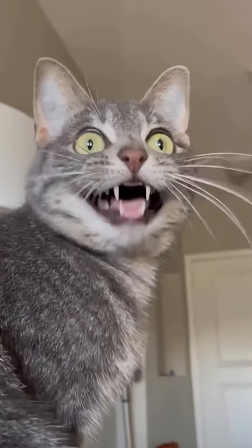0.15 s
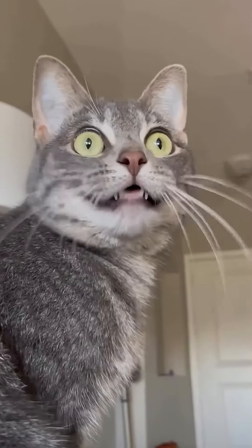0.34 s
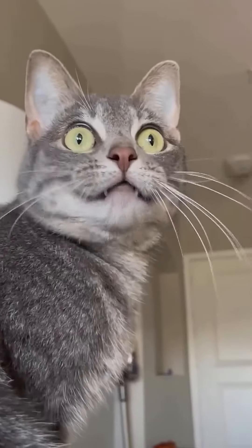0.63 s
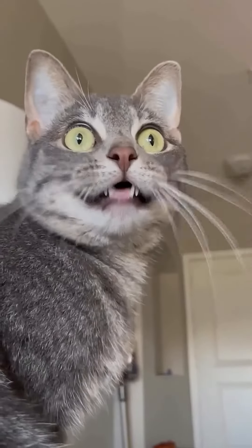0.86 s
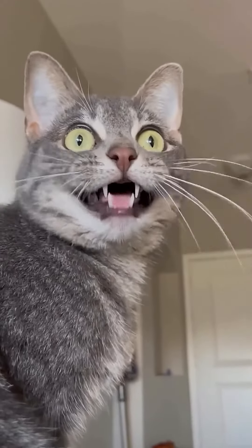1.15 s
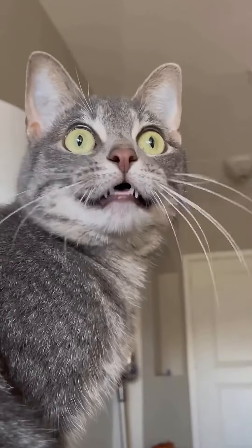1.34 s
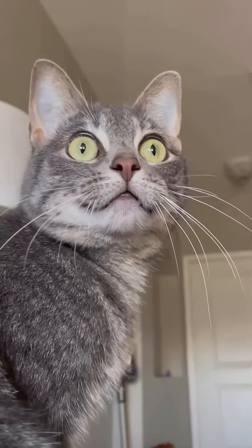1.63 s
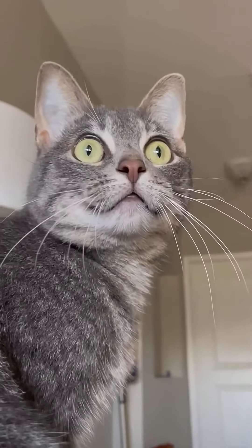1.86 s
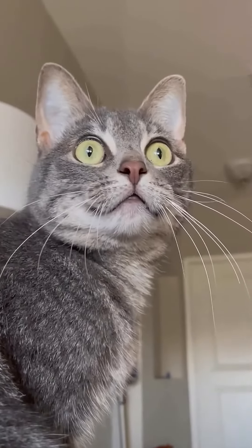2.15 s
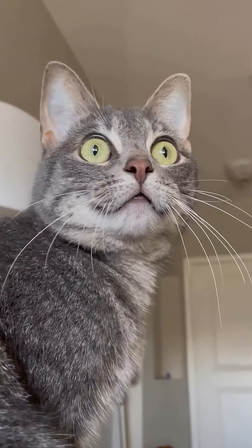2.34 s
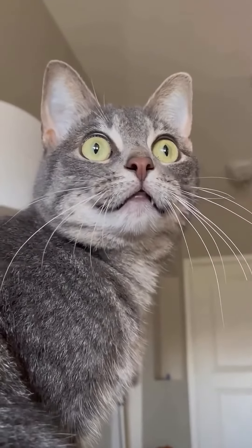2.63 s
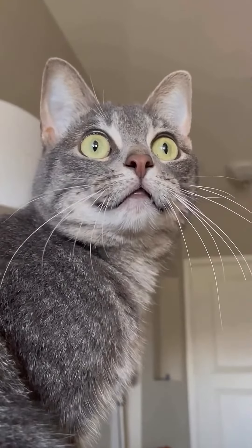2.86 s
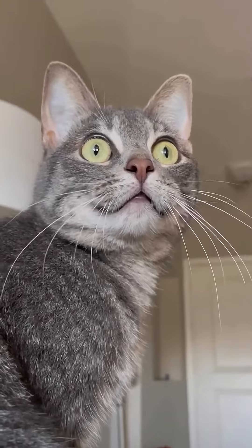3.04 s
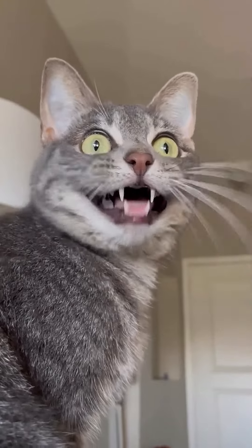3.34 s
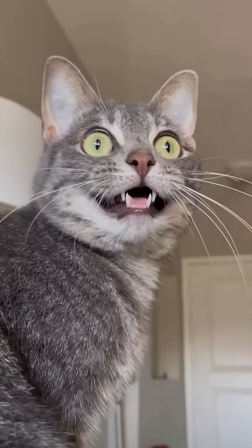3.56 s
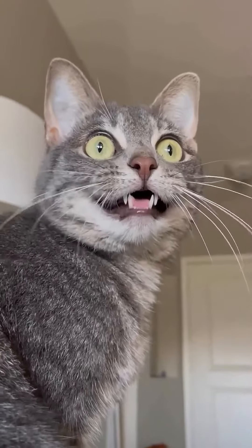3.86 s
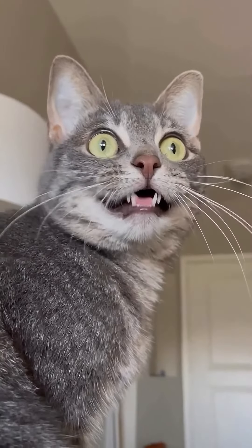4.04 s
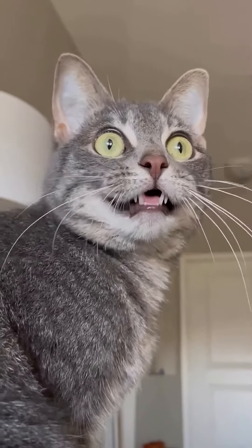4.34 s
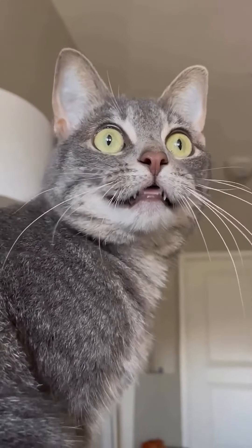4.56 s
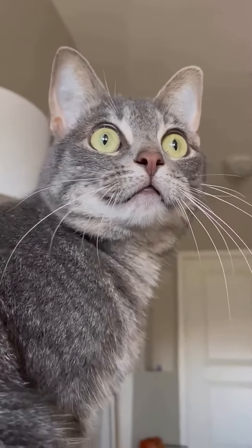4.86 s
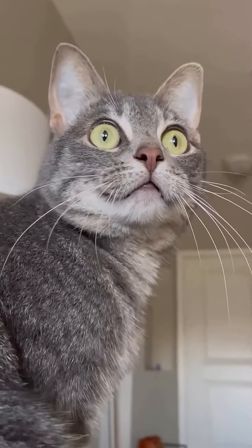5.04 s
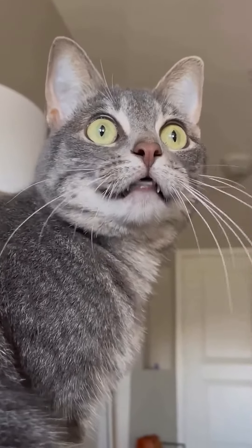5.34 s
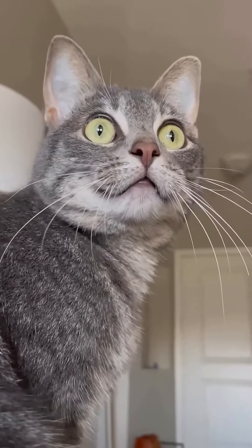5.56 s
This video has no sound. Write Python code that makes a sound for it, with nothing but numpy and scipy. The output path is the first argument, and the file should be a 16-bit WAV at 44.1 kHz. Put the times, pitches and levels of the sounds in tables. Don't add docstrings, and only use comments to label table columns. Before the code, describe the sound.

Dry, bright tooth clicks from a nearby cat come first in a pair, then singly, then in a pair again. Two short chirps lead to one very brief, rough mew, then a softer clustered click and a final hard snap. Soft body thuds and faint room hum lie underneath, with a short small-room echo. Suddenly a boomy motor rumble and rushing air take over, with two small breathy huffs.

```python
import sys
import numpy as np
from scipy import signal
from scipy.fft import rfft, irfft, next_fast_len
from scipy.io import wavfile
from scipy.ndimage import map_coordinates

SR = 44100
rng = np.random.default_rng(int(sys.argv[2]) if len(sys.argv) > 2 else 0)


def undo_db(level):
    steps = np.asarray(level, float) / 20
    return 10 ** steps


def wrap_up_sound(samples):
    columns = np.atleast_2d(samples).T
    tamed = np.clip(columns, -1, 1)
    steps = np.round(tamed * 32767).astype(np.int16)
    wavfile.write(sys.argv[1], SR, steps)


N = 251370
CHANGE_S = 5.03


def unit(x):
    return x / np.sqrt(np.mean(x ** 2) + 1e-20)


def along(points, hz):
    f, v = np.transpose(points)
    return np.interp(np.log(hz + 1), np.log(f + 1), v)


def curves(rows):
    s, *cols = np.transpose(rows)
    t = np.arange(N) / SR
    return [np.interp(t, s, c, left=-120, right=-120) for c in cols]


def wobble(rate, size):
    knots = rng.standard_normal(int(size * rate / SR) + 4)
    return map_coordinates(knots, [np.arange(size) * rate / SR])


def filtered(x, response):
    m = next_fast_len(len(x) + 4096)
    return irfft(rfft(x, m) * response(np.fft.rfftfreq(m, 1 / SR)), m)[:len(x)]


def modes(peaks, f):
    total = 0
    for k, (centre, width, db) in enumerate(peaks):
        resonance = 1j * f * width / (centre * centre - f * f + 1j * f * width)
        total = total + (-1) ** k * undo_db(db) * resonance
    return total


def noise(spectrum):
    return unit(filtered(rng.standard_normal(N), lambda hz: undo_db(along(spectrum, hz))))


def add(track, s, sound):
    part = track[max(round(s * SR), 0):][:len(sound)]
    part += sound[:len(part)]


# frequency in Hz, width in Hz, level in dB re rumble.
HUM = [
    (62, 33, -5.5),
    (124.7, 13, -6.5),
]
# frequency in Hz, density in dB per Hz.
RUMBLE = [(13, -41.5), (22, -14), (65, 0), (92, -3.5), (124, 1.5), (150, -19), (200, -54.5), (330, -120)]
DUCTS = [(82, -33.5), (140, -8.5), (193, -4.5), (355, -13.5), (500, -17.5), (700, -25), (910, -51.5),
         (1540, -120)]
HISS = [(350, -28), (600, -11), (696, -11.5), (766, -4), (808, -1.5), (2290, -7.5), (2950, -10.5),
        (5300, -10), (6910, -17), (7600, -63.5), (9880, -83), (16700, -120)]
# time in seconds, change of level in dB.
SETTLES = [
    (0, 0.5),
    (3.2, 1.5),
    (3.7, -9.5),
    (4.56, -9.5),
    (5.04, -10),
]
RUMBLE_DB, DUCT_DB, HISS_DB = -46.5, -55.5, -65.5
DUCT_FOLLOWS, HISS_FOLLOWS = 0.49, 0.1


def quiet_room():
    change_db, = curves(SETTLES)
    on = np.clip((CHANGE_S + .015 - np.arange(N) / SR) / .01, 0, 1)
    hum = np.zeros(N)
    for hz, width, db in HUM:
        tone = filtered(rng.standard_normal(N), lambda f: modes([(hz, width, 0)], f) ** 2)
        hum += undo_db(db) * unit(tone)
    low = undo_db(3.3 * wobble(9.9, N) - 3.5) * noise(RUMBLE) + hum
    duct_db = DUCT_DB + DUCT_FOLLOWS * change_db + 1.05 + 2.2 * wobble(14, N)
    ducts = undo_db(duct_db) * noise(DUCTS)
    hiss_db = HISS_DB + HISS_FOLLOWS * change_db + 3.0 + 0.54 * wobble(3.1, N)
    hiss = undo_db(hiss_db) * noise(HISS)
    return on * (undo_db(RUMBLE_DB + change_db + 1.0) * low + ducts + hiss)


# frequency in Hz, level in dB.
MOTOR = [
    (57, 3.5),
    (113, -5),
    (170, -15),
    (226, -10.5),
]
# frequency in Hz, density in dB per Hz.
BODY = [(15, -47), (25, -23), (39, -5), (59, -8.5), (85, -7), (117, -6.5), (156, -10.5), (377, -11),
        (719, -25.5), (900, -17.5), (1170, -54), (1980, -120)]
AIR = [(290, -37), (500, -23), (549, 0.5), (718, -30), (906, -5.5), (1300, -9.5), (1620, -9.5),
       (2220, -13.5), (2410, -25), (4470, -28.5), (4850, -26.5), (7130, -40.5), (8100, -54.5),
       (10500, -95.5), (17800, -120)]
MOTOR_DB, BODY_DB, AIR_DB = -37.5, -37, -51
SETTLE_S, START_DB, SWELL_DB_PER_S = 0.024, -20.5, 12
BODY_FASTER, AIR_FASTER = 2.8, 3


def droning_room():
    t = np.arange(N) / SR - CHANGE_S

    def settle(faster):
        return START_DB * np.exp(-np.clip(t * faster / SETTLE_S, -2, None))

    motor_db = MOTOR_DB + settle(0.96) + SWELL_DB_PER_S * np.maximum(t - .3, 0)
    body_db = BODY_DB + settle(BODY_FASTER)
    air_db = AIR_DB + settle(AIR_FASTER)
    drift = np.cumsum(1 + 0.0305 * wobble(12, N)) / SR
    motor = np.zeros(N)
    for hz, db in MOTOR:
        motor += undo_db(db + 1.2 * wobble(5, N)) * np.sin(2 * np.pi * hz * drift)
    on = np.clip(t / .008 + 1, 0, 1)
    body = undo_db(body_db - 1.6) * noise(BODY)
    air = undo_db(air_db + 3.0 + 0.75 * wobble(26, N)) * noise(AIR)
    return on * (undo_db(motor_db + 1.0) * motor + body + air)


# frequency in Hz, t60 in seconds.
WALLS = [(300, 0.08), (900, 0.26), (2300, 0.29), (7000, 0.14)]


def walls(x):
    hz, t, z = signal.stft(rng.standard_normal(SR // 2), SR, nperseg=256)
    decay = undo_db(-60 * t / along(WALLS, hz)[:, None])
    tail = signal.istft(z * decay, SR, nperseg=256)[1]
    return signal.fftconvolve(np.pad(x, (250, 0)), tail / np.linalg.norm(tail))[:N]


# start in seconds, peak level in dB, frequency in Hz.
THUDS = [(0.219, -35, 115), (0.25, -33.5, 135), (1.27, -33.5, 217), (1.284, -30.5, 99), (1.966, -31, 121),
         (2.73, -37, 143), (2.757, -33, 101.5), (3.797, -40.5, 370), (3.83, -42, 117.5),
         (4.732, -44.5, 104), (0.155, -41, 326), (4.73, -33, 502), (4.742, -40, 338), (4.764, -44, 250),
         (3.166, -34, 482)]


def thuds():
    out, t = np.zeros(N), np.arange(SR // 8) / SR
    for s, db, hz in THUDS:
        decay = undo_db(db + 20.0 - 60 * t / 0.02)
        onset = 1 - np.exp(-t / 0.0057)
        add(out, s, decay * np.sin(2 * np.pi * hz * t) * onset)
    return out


# time in seconds, level in dB.
EXHALE = [
    (2.2, -84),
    (2.418, -67.5),
    (2.56, -61),
    (2.614, -65.5),
    (3.08, -64.5),
]


def exhale():
    nose = [(2030, 370, -16.5), (3735, 170, -12.5), (6400, 300, -7.5)]
    air = unit(filtered(rng.standard_normal(N), lambda f: modes(nose, f)))
    return undo_db(curves(EXHALE)[0] + 5.0) * air


SHAPES = {"open": (3500, -1.1, -0.5), "cupped": (2520, 1, 11), "teeth": (4660, -12.5, 0),
          "narrow": (6180, -3, 6.8), "round": (710, 15, 6), "huff": (2940, 0.5, 2.1),
          "chirping": (3600, 4.9, 0.71), "closing": (700, 30, 3), "lips": (6100, -33, 9.9)}
PUFFS_BY_SHAPE = { "open": [(0, -47.5, .0014, .12), (.215, -34.5, .01, .095), (1.27, -35.5, .01, .091),
                  (1.945, -59.5, .027, .61), (2.055, -54.5, .0098, .9), (2.118, -49, .008, .15),
                  (3.122, -24.5, .021, .11), (3.781, -36, .0049, .035), (3.82, -35.5, .0087, .098)],
                  "cupped": [(.156, -48.5, .0082, .41), (.228, -44.5, .0047, .16), (3.18, -60, .02, .39),
                  (4.76, -42, .023, .15)], "teeth": [(3.801, -24, .013, .04), (4.732, -25.5, .011, .09)],
                  "narrow": [(3.066, -32.5, .0072, .2), (3.095, -29, .03, .15), (4.733, -31, .02, .12)],
                  "round": [(1.297, -46, .0028, .081)], "chirping": [(2.509, -52.5, .0036, .04),
                  (2.704, -35, .007, .08), (3.075, -33, .035, .15)], "closing": [(3.14, -33, .022, .16),
                  (4.735, -40, .01, .15)], "lips": [(3.667, -56, .002, .02), (3.7, -51, .002, .02),
                  (3.758, -49.5, .002, .035)]}
HUFFS_BY_SHAPE = {"narrow": [(5.478, -42, 0.027, .046)], "huff": [(5.495, -34, 0.0056, 0.12),
                  (5.543, -40, 0.017, .14), (5.605, -54, 0.0087, 0.13)]}


def puffs(table):
    out, t = np.zeros(N), np.arange(SR // 3) / SR
    for name, rows in table.items():
        whistle_hz, low_db, whistle_db = SHAPES[name]
        mouth = [(740, 750, low_db), (2450, 400, -3.5), (4450, 6400, -14.5), (6770, 920, -6.5)]
        whistle = [(whistle_hz, 450, whistle_db)]
        for s, db, rise, t60 in rows:
            air = filtered(rng.standard_normal(len(t)), lambda f: modes(mouth, f) + modes(whistle, f))
            onset = np.sin(np.pi / 2 * np.clip(t / rise, 0, 1))
            decay = undo_db(-60 * np.maximum(t - rise, 0) / t60)
            flutter = undo_db(db + 2.5 * wobble(150, len(t)))
            add(out, s, flutter * onset * decay * unit(air))
    return out


RISE_DB_PER_S, FALL_DB_PER_S, EDGE_S = 2300, 2200, .016
GLIDE_PER_S, DULL_PER_DB = 8, .35


def chirp(s, hz, db, slope_db, hold):
    rise, fall = RISE_DB_PER_S * EDGE_S, FALL_DB_PER_S * EDGE_S
    start_hz = hz * (1 + GLIDE_PER_S * EDGE_S)
    end_hz = hz * (1 - GLIDE_PER_S * hold / 2)
    return [(s - EDGE_S, start_hz, db - rise, slope_db - DULL_PER_DB * rise),
            (s, hz, db, slope_db),
            (s + hold, end_hz, db - 2, slope_db - 1000 * hold),
            (s + hold + EDGE_S, end_hz, db - fall, slope_db - DULL_PER_DB * fall)]


# peak in seconds, pitch in Hz, level in dB,
# overtone slope in dB per harmonic, hold in seconds.
CHIRPS = [
    (.3, 1265, -52, -30, .009),
    (2.514, 985, -25.5, -10, .001),
    (2.7105, 870, -23.5, -12, .006),
    (5.052, 875, -48, -30, .02),
]
# time in seconds, pitch in Hz, level in dB, overtone slope in dB per harmonic.
MEW = [(3.059, 800, -48, -9), (3.0705, 775, -17, -2.5), (3.079, 722, -17, -.8), (3.093, 724, -16.5, -.2),
       (3.101, 694, -19.5, -1), (3.115, 722, -19.5, -3), (3.12, 790, -19, -3.2), (3.128, 815, -20.5, -4),
       (3.137, 920, -38, -18)]
# frequency in Hz, gain in dB.
THROAT = [(600, 0), (1450, 0), (2150, 0), (2850, -7), (3550, -7), (4300, -15), (5000, -25), (5700, -18),
          (6300, -13), (7200, -26)]
# frequency in Hz, width in Hz, level in dB.
GLASS = [(2155, 5, -7), (2180, 6, -7), (3600, 8, -11), (3640, 9, -11)]


def voice():
    out, k = np.zeros(N), np.arange(1, 11)[:, None]
    for call in [chirp(*row) for row in CHIRPS] + [MEW]:
        s, *cols = np.transpose(call)
        t = np.arange(s[0], s[-1], 1 / SR)
        hz, db, slope_db = (np.interp(t, s, c) for c in cols)
        jitter = 1 + .007 * wobble(250, len(t))
        phase = 2 * np.pi * np.cumsum(hz * jitter) / SR
        shimmer_db = np.sqrt(k) * .4 * np.array([wobble(200, len(t)) for _ in k])
        lag = .8 * k ** 2
        lag = lag + .013 * k ** 2 * np.array([wobble(500, len(t)) for _ in k])
        overtone_db = slope_db * (k - 1) ** .8
        level = undo_db(db + overtone_db + along(THROAT, k * hz) + shimmer_db)
        add(out, s[0], np.sqrt(2) * np.sum(level * np.cos(k * phase + lag), axis=0))
    return out + filtered(out, lambda f: modes(GLASS, f))


# time in seconds, peak in dB, brightness in dB per octave, extra cavity ring in dB.
CLICKS = [(0.153, -7.5, 0.5, 2), (0.212, -7, 0.5, 1), (1.2669, -5.5, -1.5, -3.5), (2.0512, -7.5, 4, -0.5),
          (2.115, -6, 4.5, -0.5), (3.7976, -10, 2.5, -2.5), (4.7272, -23, -5.5, 1), (4.7285, -16, 2.5, -2),
          (4.7302, -3, 3, 3), (4.7325, -14.5, -1, -12)]
# time in seconds, peak in dB, brightness in dB per octave, cavity ring in dB.
BOUNCES = [
    (3.7838, -22, -3, 0),
    (3.7861, -20, 1, 0),
    (3.8003, -16, 1, 0),
]
# frequency in Hz, gain in dB.
MOUTH = [(250, -24), (500, -13), (1100, -7), (1550, -7), (1880, -19), (2250, -1), (2480, 0), (3000, -10),
         (3900, -9), (4550, -5), (5400, -17), (6200, -11), (6900, -17), (7600, -34)]


def clicks():
    out, size = np.zeros(N), 1024
    hz = np.fft.rfftfreq(size, 1 / SR)
    ms = (np.arange(size) - size // 2) / SR * 1000
    for s, db, bright_db, cavity_db in CLICKS + BOUNCES:
        cavity = cavity_db * np.exp(-((hz - 2450) / 300) ** 2)
        gain = undo_db(along(MOUTH, hz) + cavity + bright_db * np.log2((hz + 100) / 2400))
        cepstrum = irfft(np.log(gain + 1e-3))
        phase = 2 * rfft(cepstrum[:size // 2], size).imag
        early = .00045 * np.exp(-((hz - 2750) / 750) ** 2)
        phase = phase + 2 * np.pi * np.cumsum(early) * hz[1]
        ring = np.roll(irfft(gain * np.exp(1j * phase)), size // 2)
        lead = undo_db(-26 + 2.5 * np.minimum(ms, 0)) * (ms < 0) * rng.standard_normal(size)
        pulse = ring / np.abs(ring).max() + lead
        add(out, s + 0.001225 + ms[0] / 1000, undo_db(db - 1.77) * pulse)
    return out


# frequency in Hz, gain in dB.
MIC = [(100, -18), (250, -7), (500, -1), (700, 0), (6800, 0),
       (7300, 0), (7900, -22), (8800, -34), (9500, -54.5), (15000, -89), (16000, -120)]
# frequency in Hz, gain in dB.
LATE_COLOUR = [(20, 3), (4500, -3.5), (4950, -15.5), (5500, -6.5), (7900, 8), (8400, -5), (8900, -53),
               (16000, -120)]


def scene():
    cat = clicks() + puffs(PUFFS_BY_SHAPE) + voice() + exhale()
    cat = cat + undo_db(-21.5) * walls(cat)
    cat = cat / (1 + np.abs(cat / .52) ** 6) ** (1 / 6)
    cat = filtered(cat, lambda hz: undo_db(along(MIC, hz)))
    late = puffs(HUFFS_BY_SHAPE) + droning_room()
    late = filtered(late, lambda hz: undo_db(along(LATE_COLOUR, hz)))
    return (cat + thuds() + quiet_room() + late)[None]


# time in seconds, peak in dB.
CRACKLE = [(3.8028, -38), (3.8065, -44), (3.8187, -36), (3.8228, -56), (5.6995, -55)]
TICK_LAG_S, TICK_DB, LOUD_DB = .01, -54, -10


def ticks():
    out = np.zeros(N)
    after_clicks = [(s + TICK_LAG_S, db + TICK_DB) for s, db, *_ in CLICKS if db > LOUD_DB]
    for s, db in CRACKLE + after_clicks:
        out[round(s * SR)] = undo_db(db + 29)
    colour = [(6000, -25), (9000, -8), (15500, -32), (16200, -90)]
    return filtered(out, lambda hz: undo_db(along(colour, hz)))


def top_cut(x):
    return signal.sosfilt(signal.butter(12, 15800, fs=SR, output="sos"), x)


def record(dry):
    return top_cut(dry + ticks())


dry = scene()
out = record(dry)
wrap_up_sound(out)
```